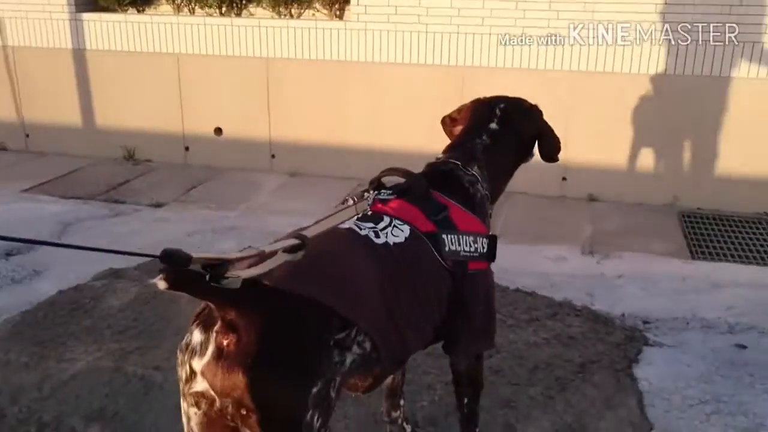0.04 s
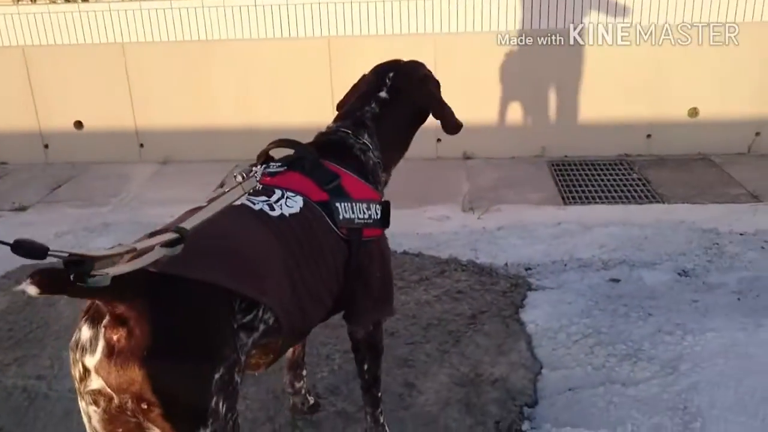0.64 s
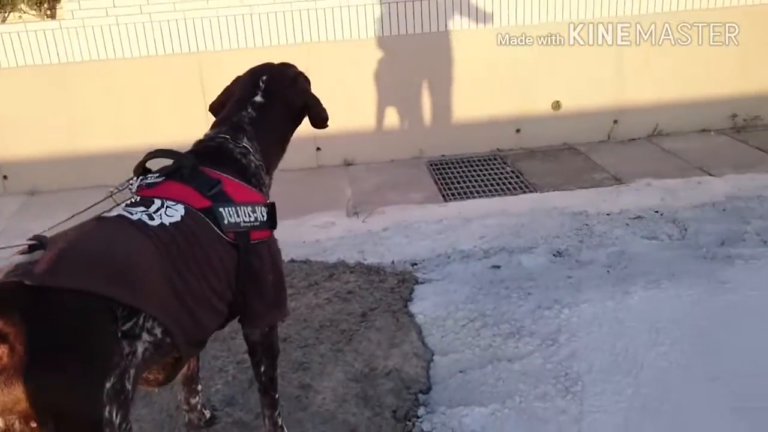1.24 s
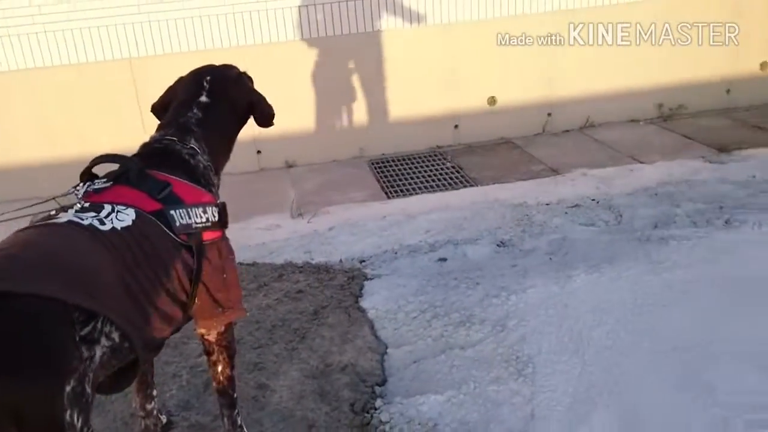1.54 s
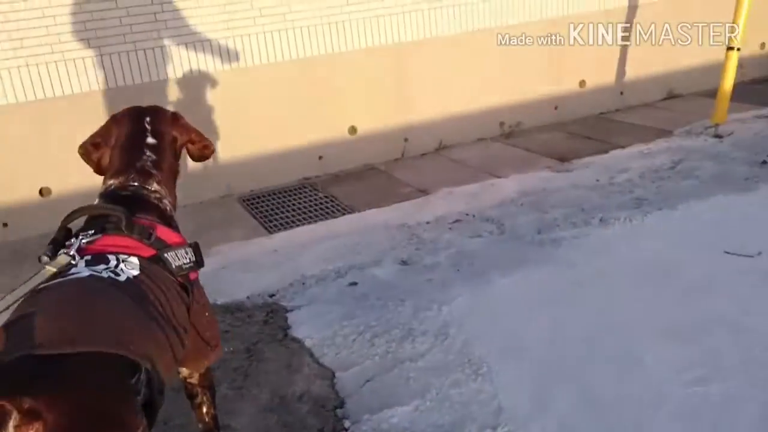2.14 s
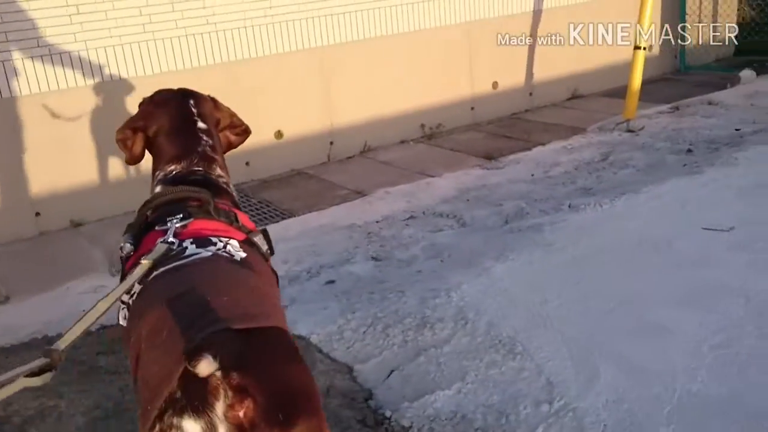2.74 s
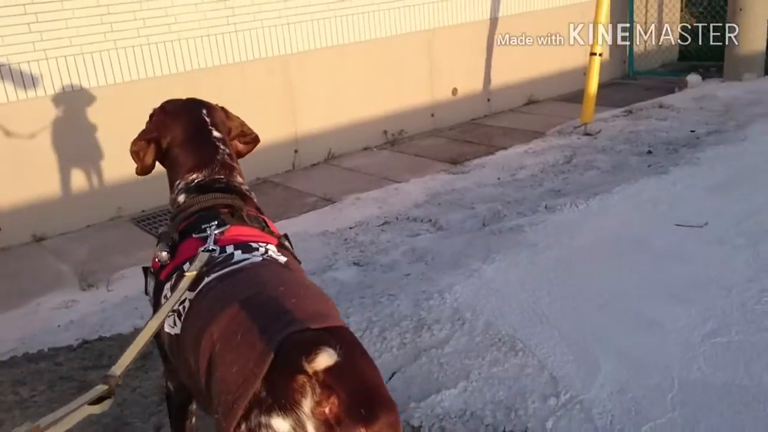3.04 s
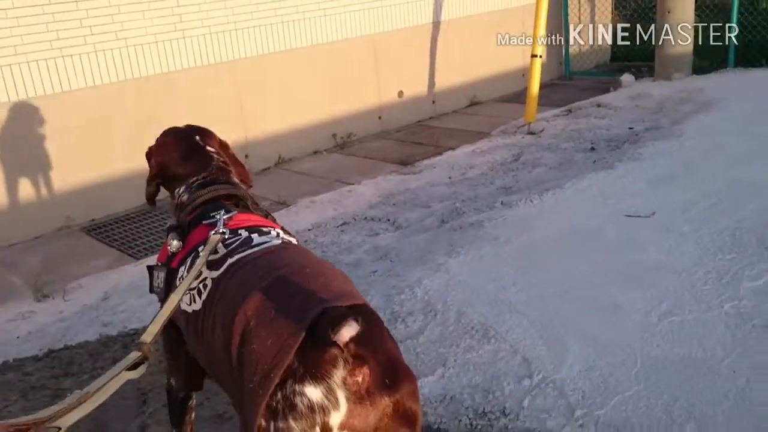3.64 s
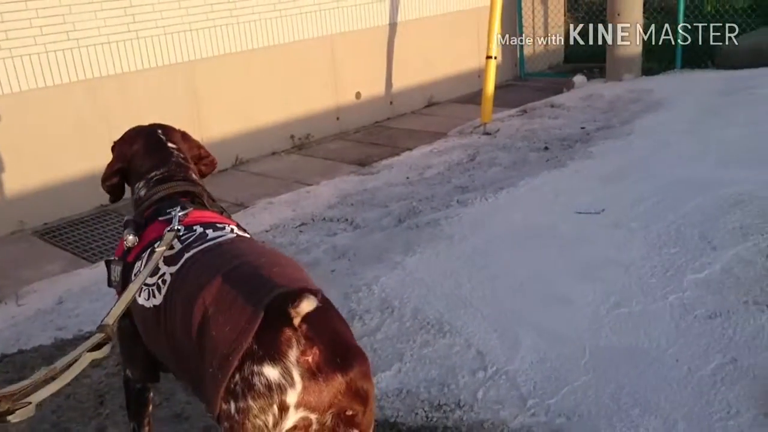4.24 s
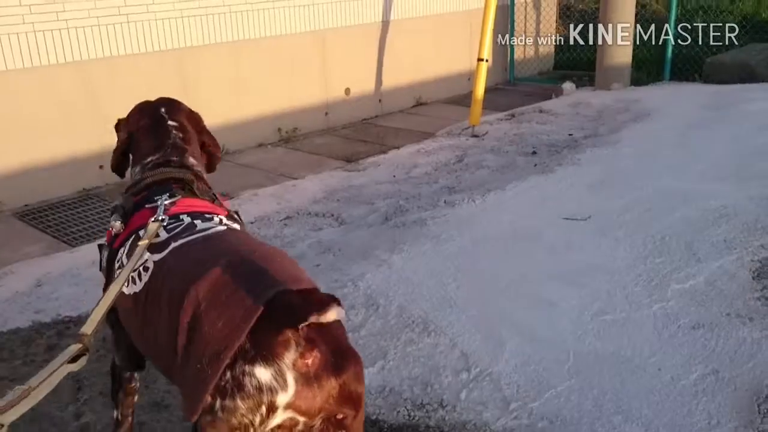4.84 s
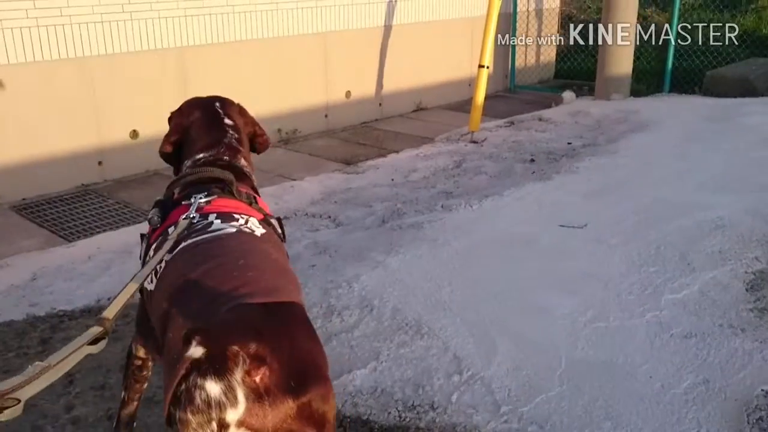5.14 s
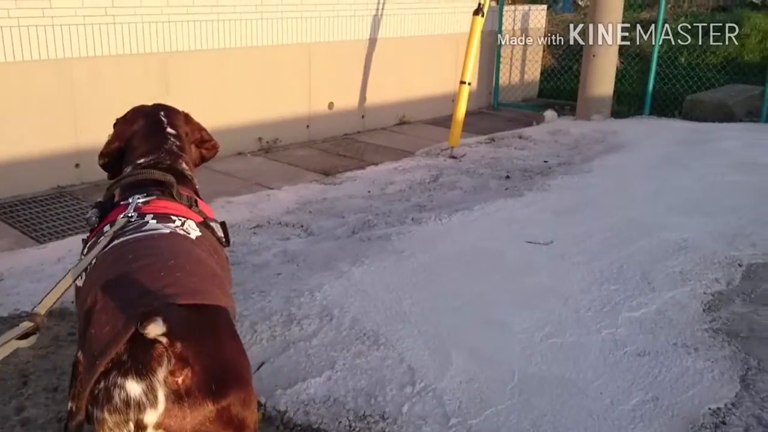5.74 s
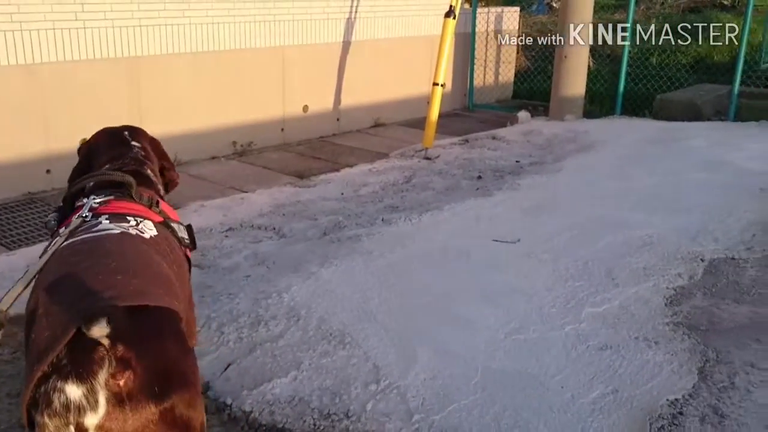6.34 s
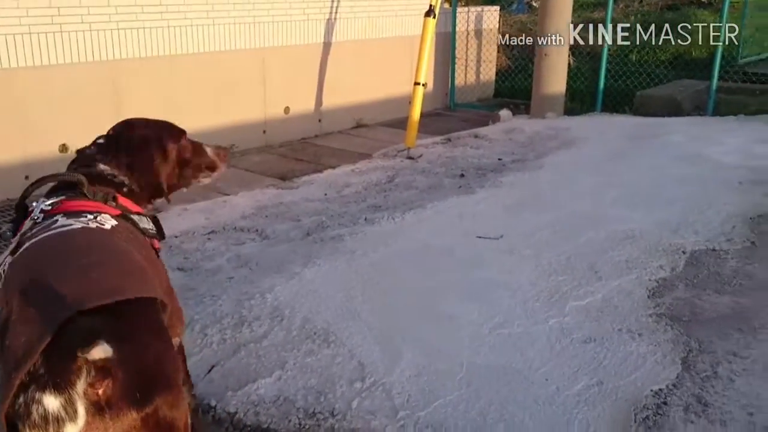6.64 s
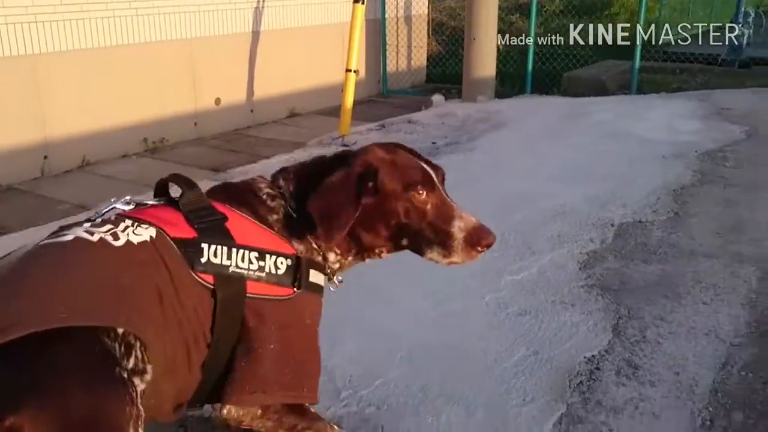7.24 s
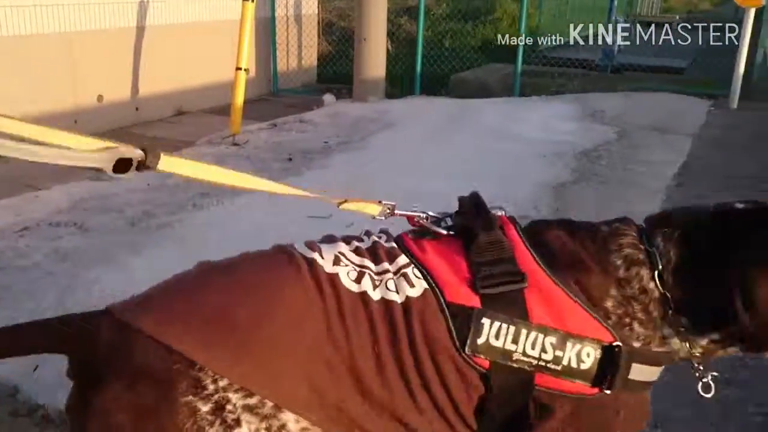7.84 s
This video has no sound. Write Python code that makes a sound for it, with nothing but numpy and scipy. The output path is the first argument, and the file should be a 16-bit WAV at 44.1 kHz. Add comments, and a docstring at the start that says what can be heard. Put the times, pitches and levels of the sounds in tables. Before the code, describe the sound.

Five deep, slightly hoarse barks from a big dog, evenly spaced, with wind buffeting the microphone and faint distant traffic.

```python
"""A yard with frozen snow, beside a wall: a large dog gives five deep barks close to a hand-held camera.
Vocal folds drive throat and mouth resonances. Each bark starts hoarse with the jaw wide, clears as
its pitch arches and ends in a rasp; wall and yard answer, and a ring on the collar shivers.
Wind buffets each microphone port, the harness ticks, snow crunches, a tag pings, far traffic murmurs."""
import sys
import numpy as np
from scipy import signal
from scipy.fft import rfft, irfft, next_fast_len
from scipy.io import wavfile
from scipy.ndimage import uniform_filter1d, minimum_filter1d, map_coordinates

SR = 44100
rng = np.random.default_rng(int(sys.argv[2]) if len(sys.argv) > 2 else 0)


def wrap_up_sound(samples):
    """Save the sound to the file named by the first command line argument, as 16-bit audio."""
    columns = np.atleast_2d(samples).T
    # keep every value between -1 and 1, then stretch to whole-number steps
    tamed = np.clip(columns, -1, 1)
    steps = np.round(tamed * 32767).astype(np.int16)
    wavfile.write(sys.argv[1], SR, steps)


N = 348255

# Table levels are relative. Camera body's shade on the left port: f/Hz, level/dB
BODY_SHADE = [(200, -9), (400, -11.5), (700, -24), (1300, -31), (2400, -43.5), (4400, -31), (8000, -29),
              (15000, -18.5)]
# far traffic: t/s, level/dB
TRAFFIC_LEVEL = [(0, -52.5), (1.2, -56), (2.8, -54), (4.3, -55.5), (6.6, -55), (7.9, -59)]
# far traffic: f/Hz, density/dB
TRAFFIC_SPECTRUM = [(30, 13.5), (100, -21), (250, 4), (550, 2), (1000, 2), (1800, -3), (3000, -12.5),
                    (4800, -24), (7200, -21), (10000, -30), (13000, -27.5), (15500, -45.5)]
# faint hollow rasp: f/Hz, width/Hz, level/dB
HOLLOW_MODES = [(660, 230, -14.5), (1305, 73, -1.5)]
# wind at each port: t/s, level/dB
WIND_LEFT = [(0.0, -54), (0.04, -29.5), (0.28, -47.9), (0.4, -27.5), (0.64, -39.5), (0.8, -37),
             (1.0, -49.6), (1.08, -35.5), (2.04, -51.5), (2.2, -32), (2.52, -47.5), (2.92, -40),
             (2.96, -23), (3.56, -23.5), (3.72, -31), (4.52, -23), (4.76, -39), (4.84, -22), (5.2, -22),
             (5.32, -39), (5.56, -33), (5.72, -45), (6.68, -21), (7.28, -37), (7.36, -29.5), (7.6, -52.5),
             (7.68, -34), (7.88, -46)]
WIND_RIGHT = [(0.0, -45), (0.12, -31), (0.4, -39.0), (0.6, -24.5), (1.16, -51), (2.439, -41.5), (2.64, -26),
              (2.84, -44), (3.0, -24), (3.4, -21.8), (3.76, -33), (3.84, -23), (4.04, -25), (4.2, -44),
              (4.32, -44), (4.48, -19.5), (4.68, -29.5), (4.72, -41.5), (5.12, -24), (6.24, -22),
              (6.4, -22.5), (6.52, -41), (7.0, -35.5), (7.36, -39.9), (7.48, -33), (7.88, -60)]
# wind noise: f/Hz, density/dB
BUFFET_SPECTRUM = [(15, -27), (30, -14), (60, 3), (100, -2), (170, -9), (300, -23), (600, -57.5),
                   (1500, -76.5)]
EDDY_SPECTRUM = [(60, -9.5), (150, 5), (260, 6), (420, -3), (700, -18.5), (1500, -61), (4000, -76)]
# single eddies: t/s, level/dB, port (0 left, 1 right)
PUFFS = [(2.659, -12.5, 1), (3.118, -12, 1), (3.154, -11.5, 0), (3.169, -11.5, 1), (3.337, -17, 0),
         (3.387, -15.5, 1), (3.481, -14, 1), (4.82, -14.5, 0), (5.054, -13, 0), (5.443, -21, 1),
         (5.794, -17.5, 1), (6.321, -10, 1), (6.414, -14, 1), (6.593, -15, 0), (6.756, -23, 0),
         (6.851, -18, 0)]
# snow crunches: centre t/s, half length/s, level/dB
CRUNCHES = [(2.164, 0.082, -60), (2.455, 0.01, -43.5), (2.576, 0.044, -48.5)]
# breaking crust: f/Hz, density/dB
CRUST_SPECTRUM = [(500, 2), (1600, 3.5), (3800, 5), (5600, -10), (7500, 4.5), (10000, -5), (13000, -3),
                  (15500, -14.5)]
# harness and leash ticks: t/s, level/dB, f/Hz
TICKS = [(0.059, -43, 3020), (1.465, -41, 5360), (2.13, -48.5, 3560), (2.1645, -39, 2450),
         (2.578, -36.5, 5430), (3.4835, -46, 6200), (5.142, -44.5, 3960), (5.154, -46, 6000),
         (6.3046, -51, 6900), (6.993, -41, 5970), (7.547, -43, 5160), (7.7536, -53, 6000),
         (7.8555, -43, 1880)]
# collar tag pings: t/s, level/dB
TAG_PINGS = [(6.895, -57.5), (6.914, -57), (7.216, -59), (7.331, -53)]
# metal collar ring: f/Hz, width/Hz, level/dB
RING_MODES = [(3110, 110, 3.5), (4700, 160, -11.5), (6240, 250, -17.5), (7200, 640, -15.5)]
# yard decay: f/Hz, T60/s
YARD_T60 = [(200, 0.99), (500, 0.66), (1400, 0.16), (3000, 1), (8000, 0.15)]
# air past the teeth: f/Hz, density/dB
TEETH_SPECTRUM = [(1800, -26), (2600, 4.5), (3150, -9), (3600, -7), (4100, -3.5), (5100, -12), (6000, -5),
                  (6600, -4), (7400, -2), (8500, -8.5), (9300, -15.5), (12400, -14.5), (15000, -34)]
# airway resonances, jaw wide or narrow: f/Hz, width/Hz, level/dB
THROAT_WIDE = [(437, 41, 11.5), (482, 70, -15.5)]
THROAT_NARROW = [(465, 79, -6.5)]
MOUTH_WIDE = [(1086, 178, 1), (1276, 76, 0.049)]
MOUTH_NARROW = [(865, 257, 3), (1131, 134, 4.1), (1375, 94, 3.4)]
MUZZLE_MODES = [(4250, 170, -9), (7400, 300, 5), (8650, 300, -4)]
# barks: pitch top t/s, level/dB, yard/dB, collar ring/dB, growl/dB, top f/Hz, fall/s, gape lead/s,
# gape boost/dB, upper throat/dB, mouth/dB, mouth tilt/(dB/octave), bite/dB, palate/dB, teeth hiss/dB
BARKS = [(0.545, -2.5, -33, -64, -54, 244.8, 0.138, 0.058, 7.5, -10, -13.5, -9.5, -12.5, -18, -35.5),
         (1.988, -7.5, -35.5, -59, -43.5, 238.6, 0.12, 0.058, 2.5, -10, -7.5, -1.5, -15, -22, -36.5),
         (3.724, -5.5, -28.5, -60.5, -38, 240.3, 0.106, 0.06, 7, -10, -10.5, -1, -6.5, -20.5, -34.5),
         (4.932, -6, -22, -50.5, -35.5, 245.3, 0.122, 0.057, -1.5, -8, -8, 17, -8.5, -13.5, -35),
         (6.136, -6, -30, -53, -43, 237.9, 0.11, 0.058, 3.5, -8, -9, 12, -10, -13.5, -36.5)]

RISE_S, JAW_LEAD_S = 0.12, 0.027  # voice onset and jaw narrowing, ahead of the pitch top


def amp(db):
    """Decibels to gain."""
    return 10 ** (np.asarray(db) / 20)


def unit(x):
    """x at rms 1."""
    return x / np.sqrt(np.mean(x ** 2) + 1e-20)


def steady(x):
    """x held at rms 1 over a few voice cycles."""
    window = signal.windows.hann(SR // 30)
    power = signal.fftconvolve(x * x, window / window.sum(), "same")
    return x / np.sqrt(np.abs(power) + 1e-12)


def bell(t, width):
    """Bump of height 1 at t = 0."""
    return np.exp(-(t / width) ** 2)


def step(t, width):
    """Smooth rise from 0 to 1 around t = 0."""
    return .5 + .5 * np.tanh(t / width)


def at_hz(points, hz):
    """(f, value) points read on a log axis."""
    f, values = np.transpose(points)
    return np.interp(np.log(hz + 1), np.log(f), values)


def timeline(points):
    """(t, value) points read at every sample."""
    return np.interp(np.arange(N) / SR, *np.transpose(points))


def wobble(rate_hz, size):
    """Smooth random curve with knots at rate_hz."""
    knots = rng.standard_normal(int(size * rate_hz / SR) + 4)
    return map_coordinates(knots, [np.arange(size) * rate_hz / SR])


def filtered(x, response):
    """x through a complex frequency response."""
    size = x.shape[-1]
    padded = next_fast_len(size + 8192)
    return irfft(rfft(x, padded) * response(np.fft.rfftfreq(padded, 1 / SR)), padded)[..., :size]


def noise(spectrum, size):
    """Coloured noise, rms 1."""
    return unit(filtered(rng.standard_normal(size), lambda f: amp(at_hz(spectrum, f))))


def resonate(x, modes):
    """x through (f, width, level) resonances of alternating sign."""
    return filtered(x, lambda f: sum((-1) ** k * amp(db) * 1j * f * bw / (hz * hz - f * f + 1j * f * bw)
                                     for k, (hz, bw, db) in enumerate(modes)))


def ringing(modes, size):
    """Noise-driven resonances, rms 1."""
    return unit(resonate(rng.standard_normal(size), modes))


def glide(x, hz, width_hz):
    """x through one moving resonance."""
    carrier = np.exp(2j * np.pi * np.cumsum(hz) / SR)
    lowpass = signal.butter(2, width_hz / 2, fs=SR, output="sos")
    return np.real(carrier * signal.sosfilt(lowpass, x / carrier))


def band(x, low_hz, high_hz, order=2):
    """Causal band-pass."""
    return signal.sosfilt(signal.butter(order, [low_hz, high_hz], "band", fs=SR, output="sos"), x)


def add(track, start_s, x):
    """Mix x into track."""
    part = track[..., max(round(start_s * SR), 0):][..., :x.shape[-1]]
    part += x[..., :part.shape[-1]]


def from_right(x, shade=0.52):
    """Source on the right: the camera body shades the left port."""
    return np.array([filtered(x, lambda f: amp(shade * at_hz(BODY_SHADE, f))), x])


def traffic(right_db=8, left_db=-3):
    """Far traffic murmurs, mostly on the right."""
    level_db = timeline(TRAFFIC_LEVEL) + 0.18 * wobble(4.8, N)
    murmur = amp(right_db) * from_right(noise(TRAFFIC_SPECTRUM, N), shade=1.4)
    murmur[0] += amp(left_db) * noise(TRAFFIC_SPECTRUM, N)
    return amp(level_db) * murmur


def faint_sounds(whine_hz=11560, whistle_hz=1740):
    """Steady hiss and thin whine; late on, a hollow rasp as the dog turns, then a far whistle."""
    t = np.arange(N) / SR
    hiss = amp(-74.5) * band(rng.standard_normal((2, N)), 100, 13000, order=4)
    whine = amp(-80) * np.sin(2 * np.pi * np.cumsum(whine_hz + 12 * wobble(60, N)) / SR)
    rasp = amp(-52) * ringing(HOLLOW_MODES, N) * bell(t - 6.96, 0.085)
    whistle = amp(-60) * ringing([(whistle_hz, 44, 0)], N) * np.interp(t, [7.05, 7.4], [0, 1])
    return hiss + from_right(whine + rasp + whistle)


def wind(buffet_db=-3, eddy_db=-11.5, flurry_db=1.11, lump_db=2, burst_db=21.9, eddy_growth=1.4):
    """Each port is buffeted on its own; stronger gusts shed more of the bright eddies."""
    ports = []
    for strength in (WIND_LEFT, WIND_RIGHT):
        strength_db = timeline(strength)
        gust_db = strength_db + flurry_db * wobble(14, N)
        lumps = wobble(35, N)
        buffet = unit(noise(BUFFET_SPECTRUM, N) * amp(lump_db * lumps))
        eddies = noise(EDDY_SPECTRUM, N)
        bursts = np.tanh(.5 * (lumps + wobble(90, N)))
        eddies = unit(eddies * amp(burst_db * bursts))
        shedding_db = strength_db.max() + eddy_growth * (gust_db - strength_db.max())
        ports.append(amp(gust_db + buffet_db) * buffet + amp(shedding_db + eddy_db) * eddies)
    return band(np.array(ports), 41, 8000, order=4)


def puffs(width_s=0.00066, gain_db=0.5):
    """An eddy crossing a port: one short push and pull of pressure."""
    out = np.zeros((2, N))
    age = np.arange(SR // 20) / SR / width_s
    pressure = age ** 2.5 * (3.5 - age) * np.exp(-age)
    for at_s, db, port in PUFFS:
        add(out[int(port)], at_s - width_s, amp(db + gain_db) * pressure / pressure.max())
    return out


def snow(grain_db=3.5, grain_hz=700):
    """The crust gives way underfoot in short clumps of grains."""
    t = np.arange(N) / SR
    clumps = sum(amp(db) * bell(t - at_s, half_s) for at_s, half_s, db in CRUNCHES)
    grains = unit(noise(CRUST_SPECTRUM, N) * amp(grain_db * wobble(grain_hz, N)))
    return from_right(clumps * grains)


def harness(gain_db=2.02, t60_s=0.015, rise_s=0.00066):
    """Buckles and clips tick: a brief crack with a broad ring."""
    out, t = np.zeros(N), np.arange(SR // 10) / SR
    for at_s, db, hz in TICKS:
        scrape = rng.standard_normal(len(t)) * amp(-60 * t / t60_s) * (1 - np.exp(-t / rise_s))
        crack = band(resonate(scrape, [(hz, .7 * hz, 0)]), 600, 10500)
        add(out, at_s - rise_s, amp(db + gain_db) * crack / np.abs(crack).max())
    return from_right(out)


def collar_tag(ping_hz=15460, t60_s=0.13):
    """The swinging tag pings at the top of hearing."""
    out, t = np.zeros(N), np.arange(SR // 5) / SR
    for at_s, db in TAG_PINGS:
        add(out, at_s, amp(db - 60 * t / t60_s) * ringing([(ping_hz, 250, 0)], len(t)))
    return np.array([out, out])


def collar_ring(peak_s=0.061):
    """The jerk of a bark sets the metal ring shivering."""
    age = np.arange(SR * 3 // 4) / SR / peak_s
    return ringing(RING_MODES, len(age)) * age * np.exp(1 - age)


def yard(x, build_s=0.016):
    """Diffuse stereo tail; each frequency dies at its own rate."""
    hz, t, spectra = signal.stft(rng.standard_normal((2, SR)), SR, nperseg=256)
    colour_db = at_hz([(200, 3.5), (500, 4), (1400, 8.5), (2300, 9.5), (3200, 3.5), (4500, 2),
                       (7000, 5), (12000, -1.5)], hz)[:, None]
    decay = amp(-60 * t / at_hz(YARD_T60, hz)[:, None])
    onset = 1 - np.exp(-t / build_s)
    tail = signal.istft(spectra * amp(colour_db) * decay * onset, SR, nperseg=256)[1]
    return signal.fftconvolve(x[None], tail / np.linalg.norm(tail[0]), axes=1)


def wall(x, delay_s, spread_s):
    """A wall returns a cluster of weak copies."""
    t = np.arange(SR // 2) / SR
    cluster = rng.standard_normal(len(t)) * (t > delay_s) * np.exp(-t / spread_s)
    return signal.fftconvolve(x, cluster / np.linalg.norm(cluster))


def growl(lead_s=0.077, half_s=0.063):
    """Air rasps in the throat, swelling into the bark. Returns start re pitch top, sound."""
    t = np.arange(-SR // 8, SR // 8) / SR
    air = unit(band(ringing([(520, 320, -1.5), (1110, 400, -11)], len(t)), 300, 2000))
    return t[0] - lead_s, air * bell(t, half_s)


def chest_push(t, top_hz, fall_s, start_hz=151.43, end_hz=110.5,
               attack_s=0.077, attack_db=39, release_db=38, flutter_hz=55.9):
    """One push, pitch top at t = 0: level swells and drops; the voice is hoarse, clears, then rasps."""
    pitch_hz = np.where(t < 0, start_hz + (top_hz - start_hz) * bell(t, 0.58 * RISE_S),
                        end_hz + (top_hz - end_hz) * bell(t, 0.62 * fall_s))
    pitch_hz *= 1 + 0.016 * wobble(flutter_hz, len(t))
    attack = np.clip(1 - (t + RISE_S) / attack_s, 0, 1) ** 2.24
    release = np.clip(t / fall_s, 0, 1) ** 1.94
    push_db = 1.24 * wobble(flutter_hz, len(t)) - attack_db * attack - release_db * release
    hoarse = step(-t - 0.0694, 0.014)
    rasp = step(t / fall_s - 0.55, 0.18)
    return pitch_hz, push_db, np.clip(0.062 + hoarse + rasp, 0, .85)


def vocal_folds(pitch_hz, rough, jitter=0.0653, shimmer_db=3, leak=0.61, corner_hz=1800, breath=0.56):
    """One flow pulse a cycle, plus turbulence gated by each opening; rough folds beat unevenly."""
    size = len(pitch_hz)
    uneven_hz = pitch_hz * (1 + jitter * (rough + 0.24) * wobble(299.4, size))
    phase = 2 * np.pi * np.cumsum(uneven_hz) / SR
    k = np.arange(1, 17)[:, None]
    harmonics = np.cos(k * phase) / np.sqrt(1 + (k * pitch_hz / corner_hz) ** 6)
    gate = 1 + np.cos(phase) + leak
    air = unit(band(rng.standard_normal(size), 80, 2800) * gate)
    upper_air = unit(band(rng.standard_normal(size), 1320, 2800) * gate)
    tone = unit(harmonics.sum(axis=0)) * amp(shimmer_db * (rough - 0.24) * wobble(204, size))
    return np.sqrt(1 - rough) * tone + np.sqrt(rough) * air + breath * upper_air, phase


def jaw(t, closing_s, lag_s=0):
    """Jaw opening, from 1 (wide) to 0 (narrow)."""
    return step(lag_s - JAW_LEAD_S - t, closing_s)


def teeth_hiss(t, wide, phase, whistle_hz=5860, sink_hz=380, whistle_db=-6.5, pulsing=0.15):
    """Air past the teeth rings the muzzle; the sharpest resonance sinks as the jaw narrows."""
    hiss = noise(TEETH_SPECTRUM, len(t)) + 0.42 * (1 - wide) * ringing(MUZZLE_MODES, len(t))
    centre_hz = whistle_hz + sink_hz * jaw(t, closing_s=0.043)
    whistle = steady(glide(rng.standard_normal(len(t)), centre_hz, width_hz=170))
    hiss += amp(whistle_db) * (1 - .5 * wide) * whistle
    return unit(hiss * (1 + pulsing * np.cos(phase)))


def bark(top_hz, fall_s, gape_lead_s, boost_db, upper_db, mouth_db, tilt_db_oct,
         bite_db, palate_db, teeth_db):
    """The folds sound through throat and mouth; the resonances sink as the jaw narrows."""
    t = np.arange(-round(RISE_S * SR), round(fall_s * SR)) / SR
    pitch_hz, push_db, rough = chest_push(t, top_hz, fall_s)
    source, phase = vocal_folds(pitch_hz, rough)
    wide = jaw(t, closing_s=0.019)
    parting, shutting = bell(t - t[0], 0.046), bell(t[-1] - t, 0.0466)
    lips_open = (1 - parting) * (1 - shutting)

    def airway(wide_modes, narrow_modes):
        """Resonances crossfaded by the jaw."""
        return wide * resonate(source, wide_modes) + (1 - wide) * resonate(source, narrow_modes)

    # widest gape: the throat dips, the mouth rings louder
    dip_db = 5.5 * bell(t + gape_lead_s, 0.011)
    throat_db = push_db - dip_db
    front_db = mouth_db + boost_db * bell(t + gape_lead_s, 0.019) + dip_db
    throat = steady(band(airway(THROAT_WIDE, THROAT_NARROW), 273, 770))

    # "woof": the upper throat sweeps up as the lips part, far down as they shut
    upper_hz = 715 * (1 - 0.42 * parting) * (1 - 0.885 * shutting)
    upper = steady(glide(source, upper_hz, width_hz=132))
    surge_db = 7.5 * bell(t - 0.037, 0.0063)
    upper_gain = amp(upper_db + 8.1 * rough + surge_db) + amp(-2) * (shutting + parting) / 2

    tilted = [(hz, bw, db + tilt_db_oct * np.log2(hz / 1150)) for hz, bw, db in MOUTH_NARROW]
    mouth = steady(band(airway(MOUTH_WIDE, tilted), 908, 1470, order=5))
    bite = wide * unit(band(resonate(source, [(1640, 160, 0)]), 1286, 1787, order=3))
    palate_hz = 1960 + 330 * jaw(t, closing_s=0.038, lag_s=0.029)
    palate = steady(band(glide(source, palate_hz, width_hz=410), 1750, 2350, order=6))
    front = mouth + lips_open * (amp(bite_db) * bite + amp(palate_db) * palate)

    voice = lips_open * throat + upper_gain * upper + amp(front_db) * front
    hiss_db = teeth_db + 0.49 * front_db - 0.33 * throat_db  # gentler swell than the voice
    fade = np.clip(np.minimum(t - t[0], t[-1] - t) / 0.015, 0, 1)
    return fade * amp(throat_db) * (voice + amp(hiss_db) * teeth_hiss(t, wide, phase))


def dog(voice_db=-3, wall_lr_db=(-12, -17), yard_lr_db=(-6, 0), far_db=-3):
    """Barks on the right with growl and collar ring; left wall, yard and its far end answer."""
    out = np.zeros((2, N))
    for top_s, level_db, yard_db, ring_db, growl_db, *shape in BARKS:
        start_s = top_s - RISE_S
        voice = amp(voice_db + level_db) * bark(*shape)
        direct = from_right(voice)
        add(out, start_s, direct)
        offset_s, rasp = growl()
        add(out, top_s + offset_s, amp(growl_db) * from_right(rasp))
        near_echo = np.array([wall(port, delay_s=0.026, spread_s=0.052) for port in direct])
        add(out, start_s, amp(wall_lr_db)[:, None] * near_echo)
        add(out, start_s, amp(yard_db) * amp(yard_lr_db)[:, None] * yard(voice))
        far_echo = wall(band(voice, 1100, 1700), delay_s=0.2, spread_s=0.094)
        add(out, start_s, amp(yard_db + far_db) * from_right(far_echo))
        add(out, top_s - JAW_LEAD_S, amp(ring_db) * from_right(collar_ring()))
    return out


def scene():
    """All sources at the two ports."""
    return dog() + wind() + puffs() + traffic() + faint_sounds() + harness() + collar_tag() + snow()


def record(dry, ceiling=1.0, cutoff_hz=15830):
    """Camera: peak limiter, then band limit."""
    span = SR // 200
    needed = ceiling / np.maximum(np.abs(dry).max(axis=0), ceiling)
    gain = uniform_filter1d(minimum_filter1d(needed, 2 * span), span)
    return filtered(dry * gain, lambda f: f < cutoff_hz)


dry = scene()
out = record(dry)
wrap_up_sound(out)
```